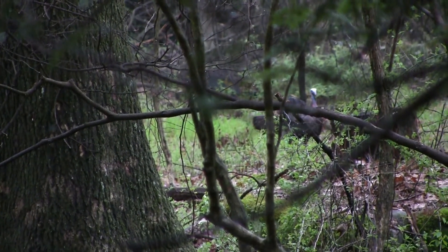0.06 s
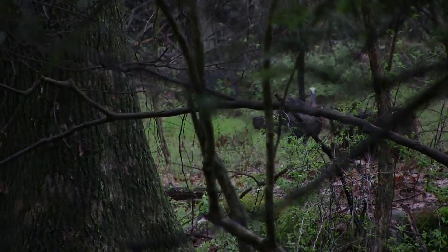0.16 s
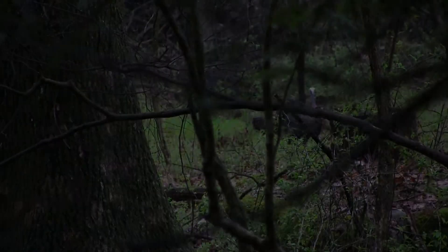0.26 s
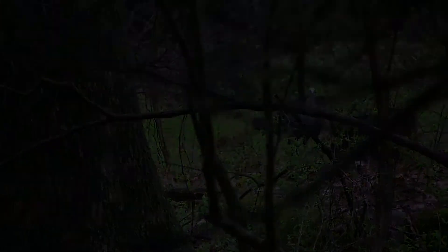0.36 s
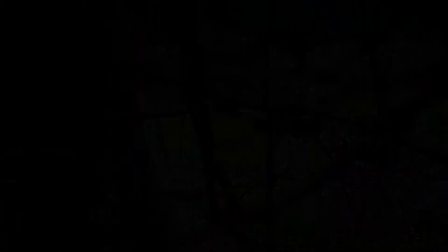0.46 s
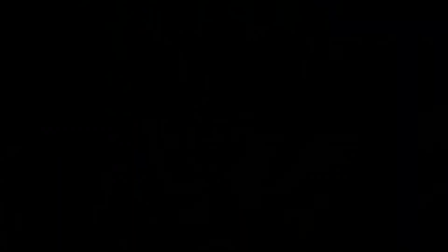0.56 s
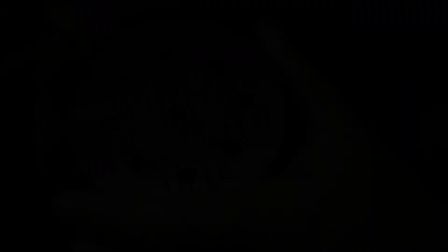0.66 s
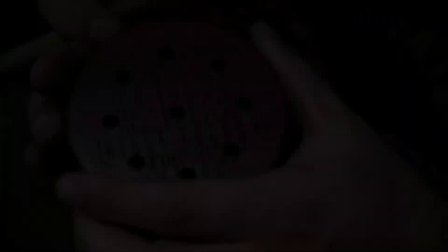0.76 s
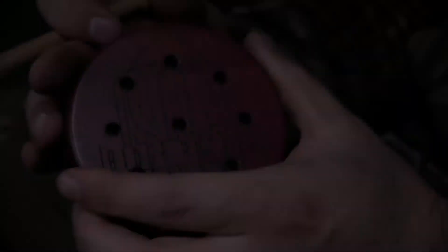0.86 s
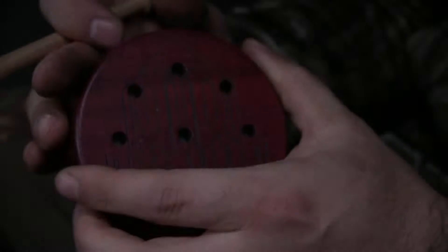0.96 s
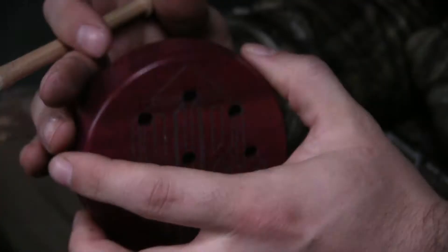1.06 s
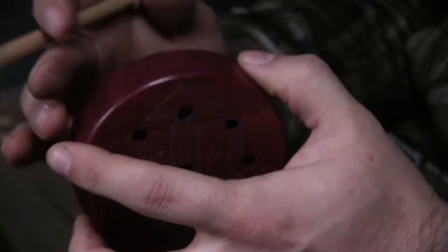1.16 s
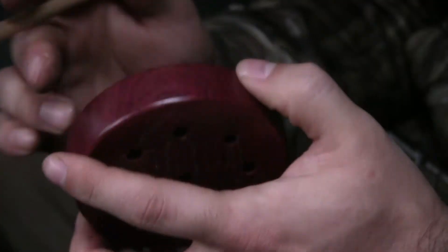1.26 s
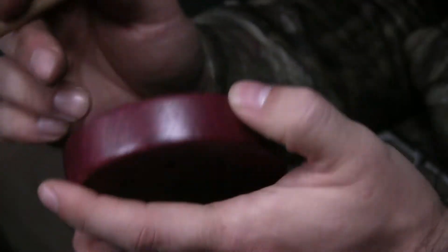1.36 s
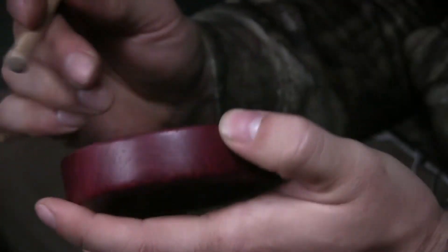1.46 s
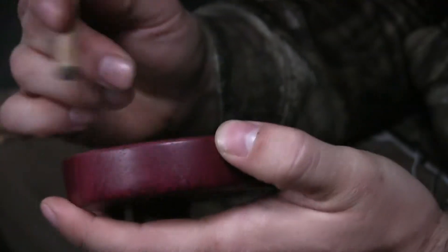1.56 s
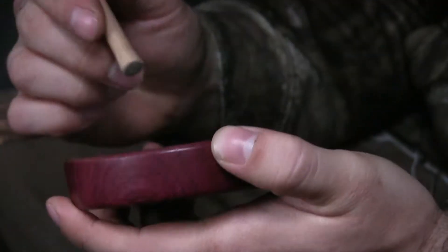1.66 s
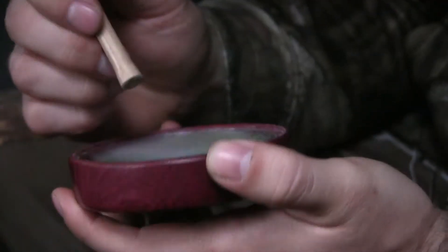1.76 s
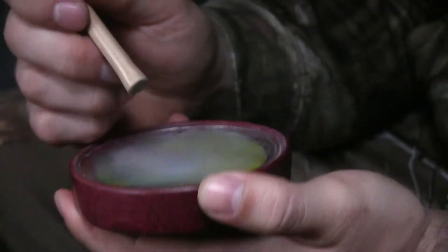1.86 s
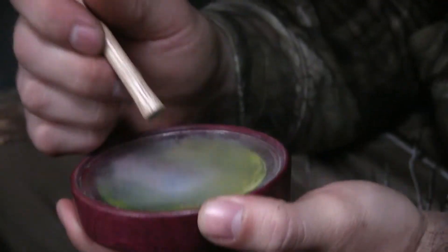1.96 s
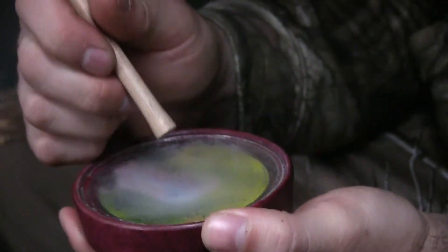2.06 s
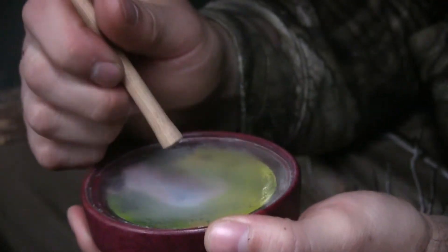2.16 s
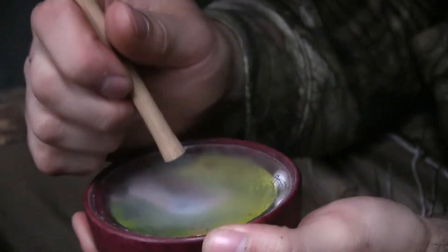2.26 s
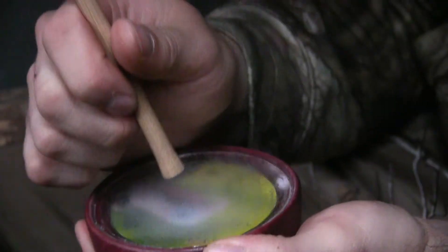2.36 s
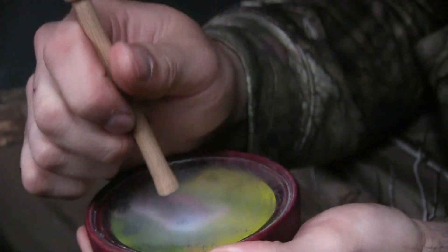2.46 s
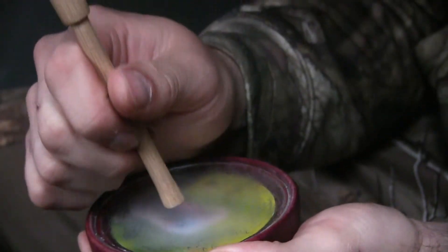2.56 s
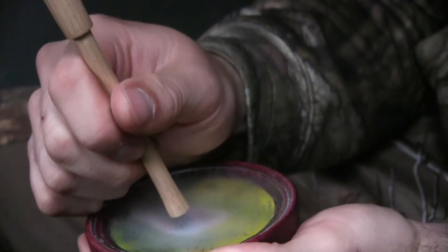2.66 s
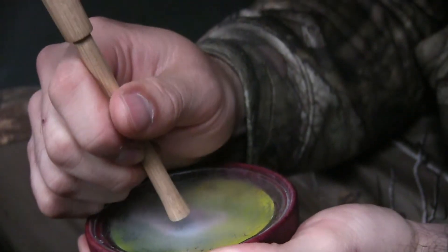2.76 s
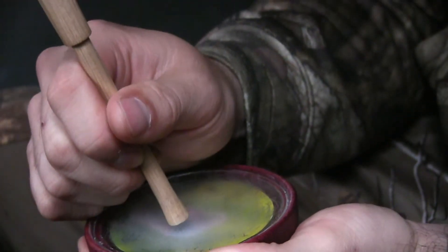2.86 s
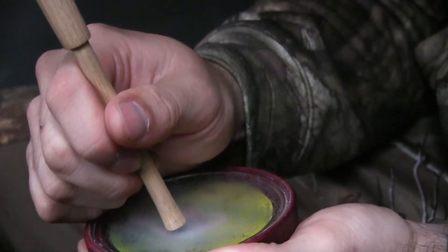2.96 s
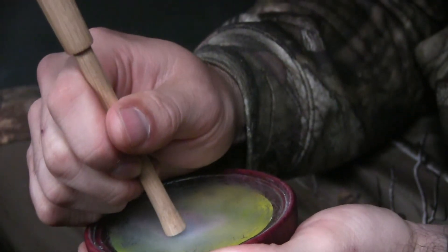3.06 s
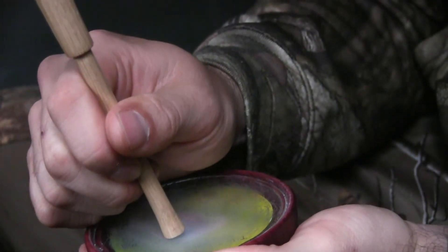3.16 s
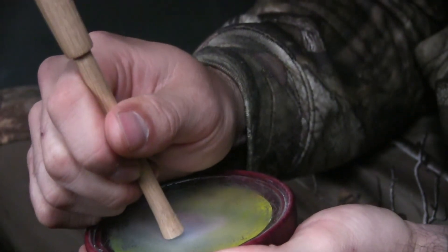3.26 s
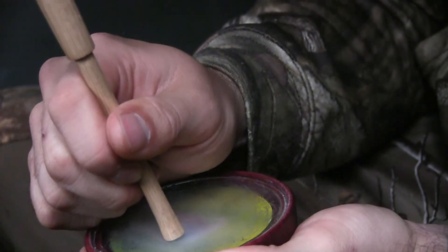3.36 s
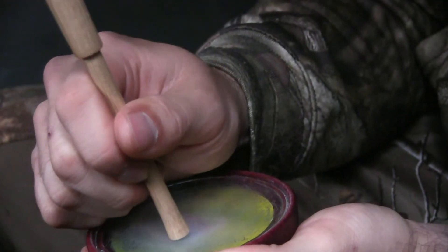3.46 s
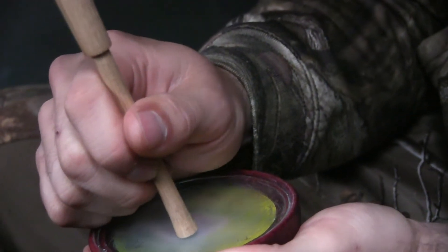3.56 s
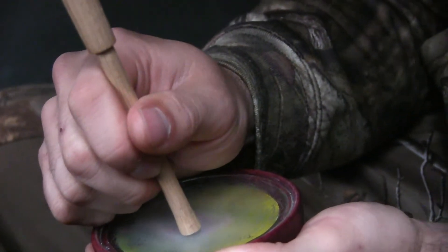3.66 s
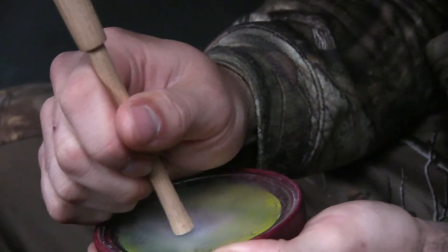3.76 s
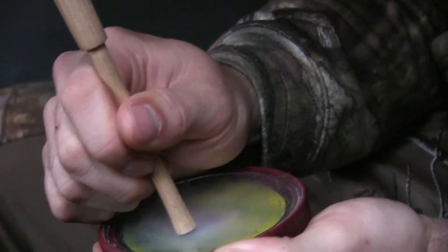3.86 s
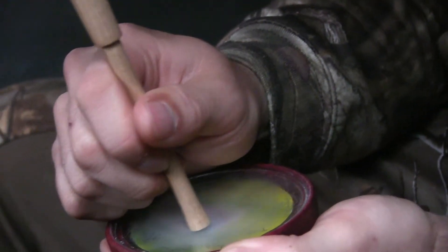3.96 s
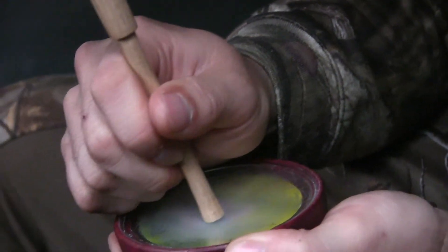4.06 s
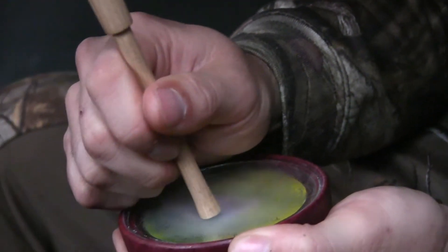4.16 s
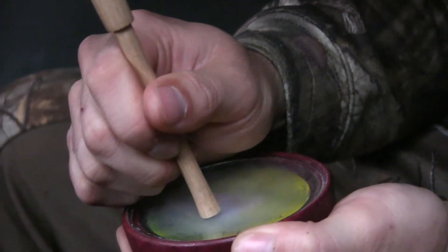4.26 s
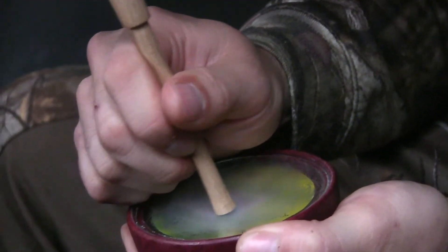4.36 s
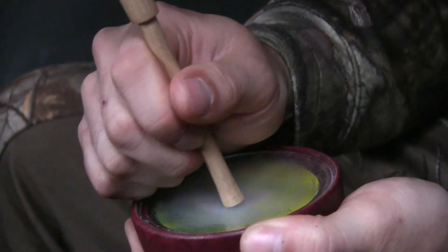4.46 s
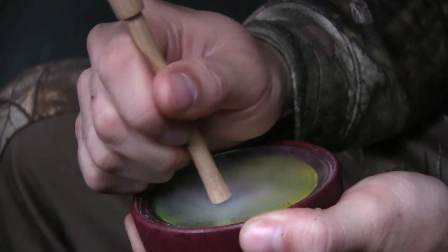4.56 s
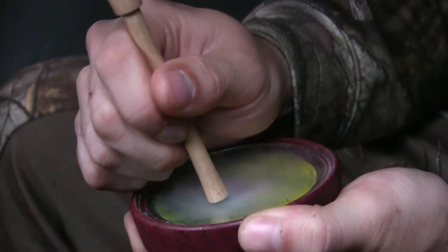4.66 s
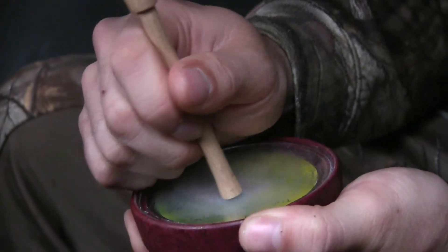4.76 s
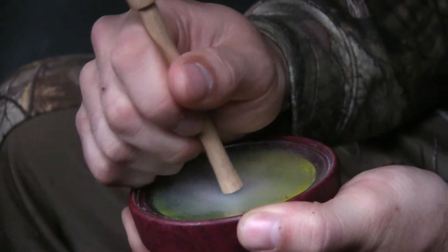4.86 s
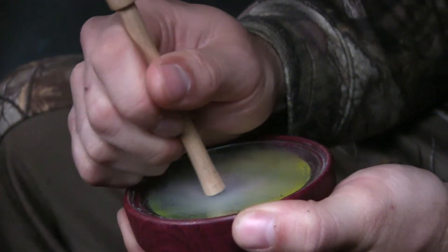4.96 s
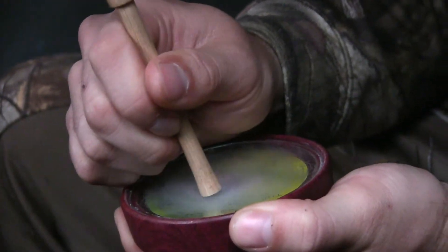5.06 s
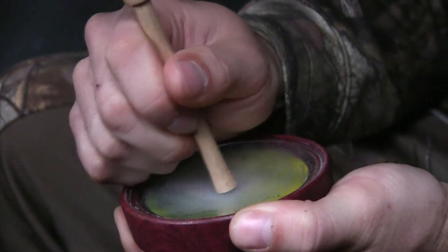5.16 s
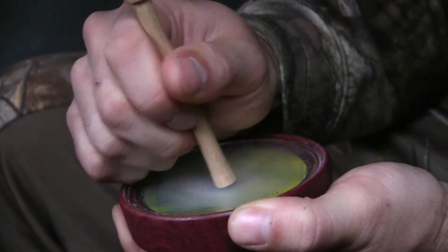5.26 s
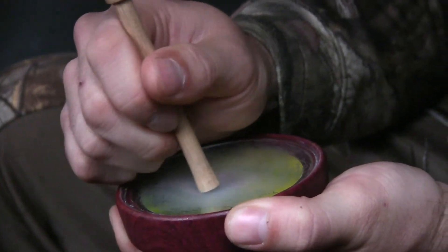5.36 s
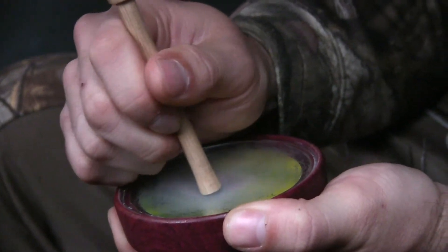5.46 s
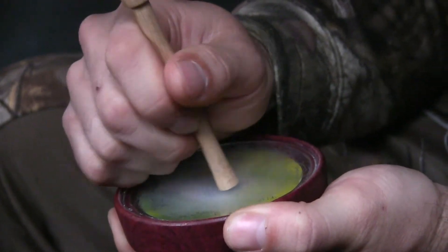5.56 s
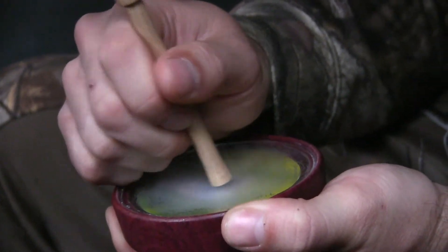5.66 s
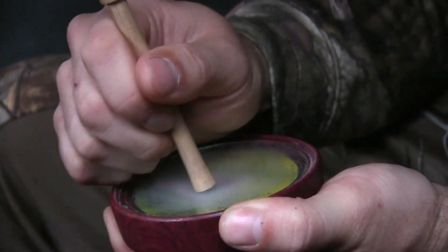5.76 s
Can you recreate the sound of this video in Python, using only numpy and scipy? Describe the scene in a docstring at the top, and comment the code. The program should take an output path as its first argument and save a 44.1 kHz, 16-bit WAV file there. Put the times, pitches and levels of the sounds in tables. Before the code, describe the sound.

A quiet woodland opens with steady soft hush, low wind rumble and tiny birds calling far away, thin short whistles scattered through the first three seconds. Around 0.5 s handled gear gives a brief small rattle. From about 1.2 to 2.9 s sleeves rustle very faintly as a pot call is turned over, with light ticks near 2.2, 2.8 and 3.1 s. At 3.4 s a wooden striker slides close by with a dry hiss, then catches into a broken, stuttering yelp from 3.5 to 3.67 s. A sharp woody knock clicks and rattles with a low thud at 3.93 s. Raspy, nasal turkey yelps follow at about 4.0, 4.4, 4.8, 5.2 and 5.5 s, the 4.0 one still broken, later ones fuller and loud, pitch dipping under pressure. Soft gritty scrapes fill the gaps, hands add low rumble, and faint reflections return from trees before a last scrape near 5.8 s.

```python
"""Quiet woods in the open: steady hush, a low rumble of wind, small birds calling far off.
From half a second in, gear rattles; from about 1.2 s sleeves rustle as the hunter turns over a pot call.
From 3.4 s a wooden striker, close by, slides and then yelps six times, the first two yelps broken.
The tip sticks and slips, pitch sagging under pressure, and scrapes softly on each way back.
One close knock clicks and rattles at 3.93 s, before the second yelp; from 4 s moving hands add rumble."""
import sys
import numpy as np
from scipy import signal
from scipy.fft import rfft, irfft
from scipy.io import wavfile
from scipy.ndimage import uniform_filter1d, minimum_filter1d

SR = 44100
rng = np.random.default_rng(int(sys.argv[2]) if len(sys.argv) > 2 else 0)


def dump_mix(stems):
    """Bounce the given channels to the path in sys.argv[1] as a 16-bit WAV at rate SR."""
    frames = np.atleast_2d(stems).T  # one column per channel
    limited = np.clip(frames, -1, 1)  # hard clip at full scale
    pcm = np.round(limited * 32767).astype(np.int16)
    wavfile.write(sys.argv[1], SR, pcm)


N = 257103
T = np.arange(N) / SR
HZ = np.fft.rfftfreq(N, 1 / SR)

# hush of the woods: (frequency [Hz], relative density [dB per Hz])
WOODS_COLOUR = [(20, -2), (60, 17.5), (115, 13), (190, 5), (290, 2.5), (500, 0.5), (800, 1), (1300, -3),
                (2100, -7), (3000, -7.5), (3800, -15.5), (5000, -25), (8000, -27), (15500, -30)]
# low rumble of wind and moving hands: (frequency [Hz], relative density [dB per Hz])
RUMBLE_COLOUR = [(4, -16.5), (10, 9), (22, -3), (36, -17.5), (55, -22), (90, -35.5), (200, -84.5),
                 (600, -110)]
# low rumble of wind and, from about 4 s, of the moving hands, before gusts: (time [s], level [dB])
RUMBLE_LEVEL = [(0, -21), (1.1, -28.5), (3.7, -22.5), (4.2, -23), (5.1, -18.5), (5.83, -27.5)]
# rustling sleeves: (frequency [Hz], relative level [dB])
CLOTH_COLOUR = [(300, -16), (1500, -8), (3000, 6), (6000, -7.5), (9000, -12), (15500, -21.5)]
# sleeves rustling as the pot is turned over: (middle [s], half length [s], level [dB])
SLEEVE_RUSTLES = [(1.456, 0.27, -62.5), (1.927, 0.16, -55), (2.233, 0.25, -56.5), (2.746, 0.2, -63.5)]
# far birds, levels before direct_db; the last row is the faint echo of the call before it:
# (time [s], length [s], start [Hz], middle [Hz], end [Hz], level [dB], waver [share of pitch])
BIRD_CALLS = [(.24, 0.094, 2650, 2625, 2500, -59, .005), (.62, 0.15, 2430, 2370, 2230, -61, 0.0018),
              (1.38, 0.085, 6300, 5950, 5900, -66, 0.04), (1.735, .15, 3720, 4580, 4410, -57.5, .012),
              (2.02, 0.16, 3830, 3860, 3800, -52, 0.0066), (2.48, 0.144, 5860, 6200, 6200, -70.5, 0.0066),
              (2.717, 0.17, 4030, 3874, 3820, -51, 0.0053), (2.85, 0.35, 3810, 3880, 3920, -69, 0.0028)]
# handled gear and the rattle of the knock: (frequency [Hz], relative level [dB])
RATTLE_COLOUR = [(200, -4.5), (1200, -3), (2200, -3.5), (3100, 3), (4500, -7.5), (8000, -19.5),
                 (15500, -26.5)]
# rattles and brushes of handled gear, and the click and rattle of the knock at 3.93 s:
# (time [s], level [dB], rise [s], t60 [s])
RATTLE_BURSTS = [(0.523, -48, 0.0017, 0.033), (0.552, -38.5, 0.002, 0.066), (2.176, -43, 0.0015, 0.037),
                 (2.775, -44, 0.0079, 0.2), (3.115, -50, .003, 0.068), (3.169, -49, 0.0016, 0.028),
                 (3.9265, -15.5, 0.00013, 0.018), (3.93, -16, 0.00026, 0.034), (3.934, -28, 0.0037, 0.14),
                 (4.575, -32, 0.0066, 0.033), (5.458, -58, 0.002, 0.047)]
# resonances of striker, plate and pot: (centre [Hz], full width 9 dB down [Hz], gain [dB])
POT_RESONANCES = [(905, 133, 1), (1072, 540, -9), (1610, 463, 8), (2190, 160, -15.5), (2389, 328, -2.74),
                  (2972, 613, -5.5), (3590, 480, -21.5), (4160, 330, -15), (4560, 374, -11),
                  (5000, 120, -20.5), (5630, 2070, -32.5), (6540, 920, -40.5), (8340, 2000, -37.5),
                  (10400, 3095, -52.5), (12640, 4300, -56.5)]
# tip sliding without a squeal, levels before slide_db: (start [s], length [s], hiss level [dB])
TIP_SLIDES = [(3.404, 0.25, -54), (3.734, 0.16, -48.5), (4.126, .2, -48), (4.317, 0.14, -51.5),
              (4.514, 0.2, -47), (4.7, .1, -49.5), (4.915, 0.2, -46), (5.107, 0.1, -48.5),
              (5.318, 0.16, -46), (5.472, 0.083, -52), (5.708, 0.21, -43.5)]
# force of the sliding tip: (frequency [Hz], relative level [dB])
GRIT_COLOUR = [(880, -20.5), (1100, 0), (1350, -10), (1630, -18), (2100, -1.5), (2430, -8.5), (2900, -7.5),
               (3700, -1.5), (4500, -3.5), (7400, 9.5), (8400, 12), (10800, 12.5), (12500, 21.5),
               (14500, 12.5)]
# the tip catching the plate, two to five times a yelp, before hand tremor:
# (start [s], end [s], level [dB], lowest pitch [Hz], pressing time [s], easing time [s])
TIP_CATCHES = [ (3.498, 3.543, -20.5, 880.4, 0.015, 0.0089), (3.517, 3.57, -14, 877, .02, 0.0062),
               (3.57, 3.609, -10, 861.6, 0.013, 0.0071), (3.591, 3.636, -7.5, 812, 0.021, 0.028),
               (3.654, 3.673, -3, 855, 0.013, 0.0072), (3.987, 4.03, -5, 817.7, 0.02705, 0.0031),
               (4.033, 4.064, -2.5, 789, 0.02394, .008), (4.061, 4.111, -5, 749.4, 0.02264, 0.048),
               (4.376, 4.491, -7.5, 762, 0.046, 0.061), (4.469, 4.507, -5, 828, 0.029, .016),
               (4.763, 4.791, -14.5, 910, .01, .01), (4.78, 4.847, 2, 756, 0.02, 0.028),
               (4.823, 4.89, -0.5, 783.6, 0.022, 0.032), (5.156, 5.225, -3, 750.5, 0.058, .022),
               (5.207, 5.29, 3, 739, 0.031, 0.033), (5.512, 5.535, -11.5, 889, 0.0089, 0.016),
               (5.523, 5.592, -0.5, 748.7, 0.046, 0.02), (5.553, 5.683, 2, 715, .052, 0.036)]
# breathy whistle of a tip that has not quite caught: (frequency [Hz], relative level [dB])
WHISTLE_COLOUR = [(500, -46.5), (820, -17), (1000, 6.5), (1120, 0.5), (1330, -20.5), (1600, -30), (1850, 9),
                  (2020, -16), (2230, -11.5), (2600, -28.5), (2900, -18), (3500, -46.5), (15500, -55.5)]
# narrow plate modes that ring on when the tip lets go: (frequency [Hz], gain [dB], t60 [s])
PLATE_MODES = [(1600, -41.5, 0.087), (2526, 7, 0.09), (3106, -3, 0.074), (4560, -9.5, 0.12)]
# what the knock sets swinging: (frequency [Hz], peak level [dB], time to peak [s])
KNOCK_MODES = [(39.26, -9, 0.02), (73.7, -32, 0.036), (144.6, -2.5, 0.002), (2920, -21, 0.001),
               (3360, -37, 0.0018)]

SLIDE_SKEW, SLIDE_ROUND = 0.76, 1.13  # exponents: a slide peaks early and trails off
FREE_HZ = 919.6  # pitch of the unloaded striker; pressure pulls it down
PRESS_CURVE = 2.3  # exponent: pressure changes quickly at first, then settles
ATTACK_S, RELEASE_S = 0.01, 0.012
# the tip skates softly into each catch and out of it
SKATE_DB, SKATE_IN_DB_PER_S, SKATE_OUT_DB_PER_S = -30, 595, 1500
# the hand's pressure is never quite steady
TREMOR_SHARE, TREMOR_HZ, TREMOR_DB = 0.022, 60, 1.63
# bite, the lift of the upper partials, grows at once with level and pitch sag, and lets go slowly
BITE_FREE_DB, BITE_PER_DB, BITE_DB_PER_HZ, BITE_FALL_DB_PER_S = -8.5, 0.68, 0.0949, 396.5
SLIP_JITTER = 0.007  # rms share of pitch while gripping
WHISTLE_TOP_DB = -22  # cap on the level the whistle follows, before whistle_db
KNOCK_S = 3.9272
CUTOFF_HZ = 15900


def amp(db):
    """Decibels to gain."""
    return 10 ** (np.asarray(db) / 20)


def unit(x):
    """Scales to rms 1."""
    return x / np.sqrt(np.mean(x ** 2) + 1e-20)


def add(mix, s, sound):
    """Lays a sound into the mix at time s."""
    part = mix[max(round(s * SR), 0):][:len(sound)]
    part += sound[:len(part)]


def colour(points):
    """Gain at every frequency from a few (frequency [Hz], level [dB]) points."""
    hz, db = np.transpose(points)
    return amp(np.interp(np.log(HZ + 1), np.log(hz), db))


def noise(gain):
    """Noise of rms 1 with the given spectrum."""
    return unit(irfft(rfft(rng.standard_normal(N)) * gain, N))


def wander(hz):
    """A random curve of rms 1 whose motion fades out above about hz."""
    return noise(np.exp(-(HZ / hz) ** 2))


def slow_fall(db, db_per_s, t):
    """A level that rises at once but falls no faster than db_per_s."""
    fall = db_per_s * t
    return np.maximum.accumulate(db + fall) - fall


def echoes(x, t60, delay):
    """Dense scattered reflections that start after delay and die away."""
    t = T[:SR]
    tail = rng.standard_normal(SR) * amp(-60 * t / t60) * (t > delay)
    return signal.fftconvolve(x, tail / np.linalg.norm(tail))[:N]


def outdoors(woods_db=-43.5, gust_db=-1.5, cloth_db=-65):
    """Steady hush of the woods, low rumble of wind and moving hands, rustling sleeves: all shaped noise."""
    woods = amp(woods_db) * noise(colour(WOODS_COLOUR))
    rumble_db = np.interp(T, *np.transpose(RUMBLE_LEVEL)) + gust_db * wander(3.9)
    rumble = amp(rumble_db) * noise(colour(RUMBLE_COLOUR))
    movement = amp(cloth_db)
    for middle, half, db in SLEEVE_RUSTLES:
        movement = movement + amp(db) * np.exp(-((T - middle) / half) ** 2)
    cloth = movement * noise(colour(CLOTH_COLOUR)) * amp(0.67 * wander(40))
    return woods + rumble + cloth


def birds(direct_db=-2, wet_db=-3, fade_db=-5):
    """Far calls and one faint echo: sines gliding through three pitches, smeared by the trees."""
    out, wobble = np.zeros(N), wander(92)
    for s, length, start, middle, end, db, waver in BIRD_CALLS:
        u = np.linspace(0, 1, round(length * SR))
        glide = np.polyval(np.polyfit([0, 0.5, 1], [start, middle, end], 2), u)
        hz = glide * (1 + waver * wobble[round(s * SR):][:len(u)])
        whistle = np.sin(2 * np.pi * np.cumsum(hz) / SR)
        envelope = signal.windows.tukey(len(u), 0.25) * amp(fade_db * u)
        add(out, s, amp(db) * unit(whistle * envelope))
    return amp(direct_db) * out + amp(wet_db) * echoes(out, t60=0.45, delay=0.019)


def rattles():
    """Handled gear and the knock's click and rattle: gritty noise that rises fast and decays exponentially."""
    t, envelope = T[:SR // 2], np.zeros(N)
    for s, db, rise, t60 in RATTLE_BURSTS:
        decay = amp(db - 60 * np.maximum(t - rise, 0) / t60)
        add(envelope, s, np.minimum(t / rise, 1) * decay)
    return envelope * noise(colour(RATTLE_COLOUR))


def pot(hz):
    """Gain of the call's steep-sided resonances at hz, summed in power."""
    power = 0
    for centre, width, db in POT_RESONANCES:
        power = power + amp(db) ** 2 / (1 + (2 * (hz - centre) / width) ** 2) ** 3
    return np.sqrt(power)


def friction(squeal, rasp_db=-25.0, grain_db=1.0, drag_db=0.66, slide_db=10):
    """Tiny asperities rattle the pot: in slides without a squeal, and as a rasp under each squeal."""
    body = pot(HZ)
    speed = np.zeros(N)
    for s, length, db in TIP_SLIDES:
        u = np.linspace(0, 1, round(length * SR))
        add(speed, s, amp(db) * abs(np.sin(np.pi * u ** SLIDE_SKEW)) ** SLIDE_ROUND)
    roughness = amp(grain_db * wander(210) + drag_db * wander(23))
    sliding = unit(noise(body * colour(GRIT_COLOUR)) * roughness)
    strength = np.sqrt(abs(uniform_filter1d(squeal ** 2, size=200)))
    rasp_colour = colour([(880, -15), (1100, -6.5), (1600, -23), (3000, 4.0), (4600, 0),
                          (8400, -3.5), (14000, 0)])
    rasp = amp(rasp_db) * strength * noise(body * rasp_colour)
    return rasp + amp(slide_db) * sliding * speed


def pressure(t):
    """Pitch sag [Hz] and level [dB] of the tip: in each catch it is pressed down, held and eased off."""
    sag, gain = np.zeros(len(t)), np.zeros(len(t))
    for start, end, db, low_hz, press_s, ease_s in TIP_CATCHES:
        since, left = np.maximum(t - start, 0), np.maximum(end - t, 0)
        slack = 1 - np.minimum(np.minimum(since / press_s, left / ease_s), 1)
        sag = np.maximum(sag, (FREE_HZ - low_hz) * (1 - slack ** PRESS_CURVE))
        grip = (1 - np.exp(-(since / ATTACK_S) ** 2)) * (1 - np.exp(-(left / RELEASE_S) ** 2))
        before, after = np.maximum(start - t, 0), np.maximum(t - end, 0)
        skate = amp(SKATE_DB - SKATE_IN_DB_PER_S * before - SKATE_OUT_DB_PER_S * after)
        gain = np.maximum(gain, np.maximum(amp(db) * grip, skate))
    return sag, 20 * np.log10(gain + 1e-9)


def yelps(loose_jitter=0.008, grip_db=-11.0, flutter_db=1.32, loose_dull_db=-8, whistle_db=-1,
          third_share=0.73, top_share=0.69, count=21):
    """Stick-slip partials sweep through the pot's resonances; a light touch slips unevenly and whistles."""
    at = (T > 3.4) & (T < 5.75)  # the stretch that holds the yelps
    t = T[at]
    order = np.arange(1, count + 1)[:, None]
    sag, db = pressure(t)
    tremor = wander(TREMOR_HZ)[at]
    sag, db = sag * (1 + TREMOR_SHARE * tremor), db + TREMOR_DB * tremor
    loose = 1 / (1 + amp(4.03 * (db - grip_db)))  # 1 while the tip skates, 0 once it grips

    hz = FREE_HZ - sag
    jitter = (SLIP_JITTER + loose_jitter * loose) * wander(350)[at]
    turns = np.cumsum(hz * (1 + jitter)) / SR

    drive_db = BITE_DB_PER_HZ * sag + BITE_PER_DB * np.maximum(db, grip_db)
    bite_db = BITE_FREE_DB + slow_fall(drive_db, BITE_FALL_DB_PER_S, t)
    # how much of the bite each partial takes
    share = np.select([order < 3, order == 3, order < 6], [0, third_share, 1], top_share)
    # the grain of the plate makes each partial flutter
    rough = rng.standard_normal((count, len(hz)))
    grain = unit(signal.fftconvolve(rough, np.hanning(220)[None], "same", axes=1))
    flutter = flutter_db * np.sqrt(order / 2) * grain
    dulling = loose_dull_db * loose * (order > 1)
    partials = pot(order * hz) * amp(share * bite_db + dulling + flutter)
    partials /= np.sqrt((partials ** 2).sum(0) / 2)  # the level comes from db alone
    squeal = (partials * np.sin(2 * np.pi * order * turns)).sum(0)

    whistle_gain = amp(whistle_db + np.minimum(db, WHISTLE_TOP_DB)) * loose
    whistle = whistle_gain * noise(colour(WHISTLE_COLOUR))[at]
    out = np.zeros(N)
    out[at] = amp(db) * squeal + whistle
    return out


def plate(x):
    """The plate's narrow modes pick up passing partials and ring on."""
    t, ring = T[:SR // 4], np.zeros(SR // 4)
    for hz, db, t60 in PLATE_MODES:
        per_sample = 2 * np.log(1000) / (t60 * SR)  # makes db the gain at the mode's centre
        ring += amp(db - 60 * t / t60) * np.cos(2 * np.pi * hz * t) * per_sample
    return signal.fftconvolve(x, ring)[:N]


def knock():
    """A close blow: damped sines give the short ring of wood, a thud and a slow sway."""
    t, out = np.maximum(T - KNOCK_S, 0), np.zeros(N)
    for hz, db, rise in KNOCK_MODES:
        out += amp(db) * t / rise * np.exp(1 - t / rise) * np.sin(2 * np.pi * hz * t)
    return out


def scene(near_db=-30, trees_db=-48):
    """The call close by, with quick reflections from hands and ground and a faint return from the trees."""
    background = outdoors() + birds() + rattles()
    squeal = yelps()
    call = squeal + plate(squeal) + friction(squeal)
    near = amp(near_db) * echoes(call, t60=0.088, delay=0.012)
    trees = amp(trees_db) * echoes(call, t60=0.93, delay=0.042)
    return (background + call + near + trees + knock())[None]


def record(dry, ceiling=0.9, recovery_db_per_s=220):
    """A quick limiter flattens the yelps and ducks the woods behind them, then the band limit."""
    over_db = 20 * np.log10(np.maximum(abs(dry[0]) / ceiling, 1))
    needed = amp(-slow_fall(over_db, recovery_db_per_s, T))
    # the gain dips smoothly around each peak, so nothing crackles
    gain = uniform_filter1d(minimum_filter1d(needed, size=120), size=120)
    lowpass = signal.firwin(511, CUTOFF_HZ, window=("kaiser", 9), fs=SR)
    return signal.oaconvolve(dry * gain, lowpass[None], "same")


dry = scene()
out = record(dry)
dump_mix(out)
```